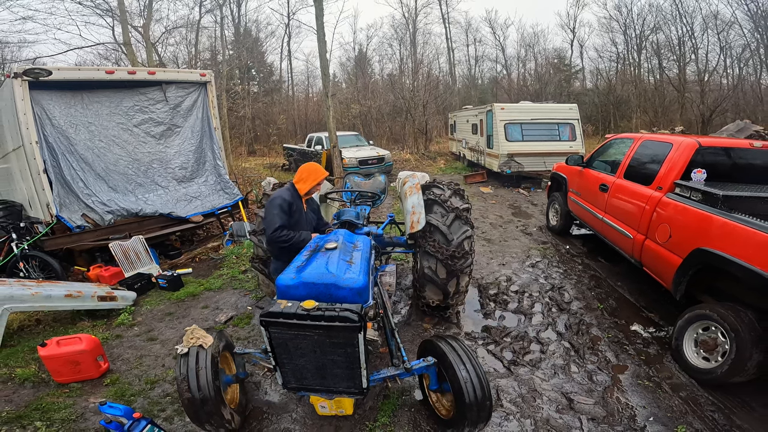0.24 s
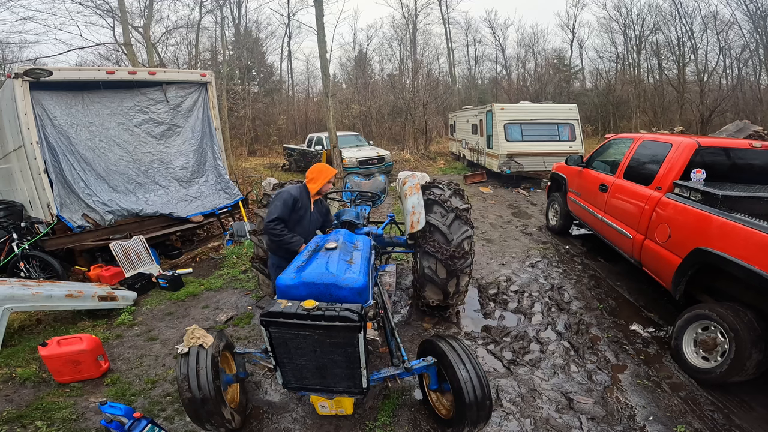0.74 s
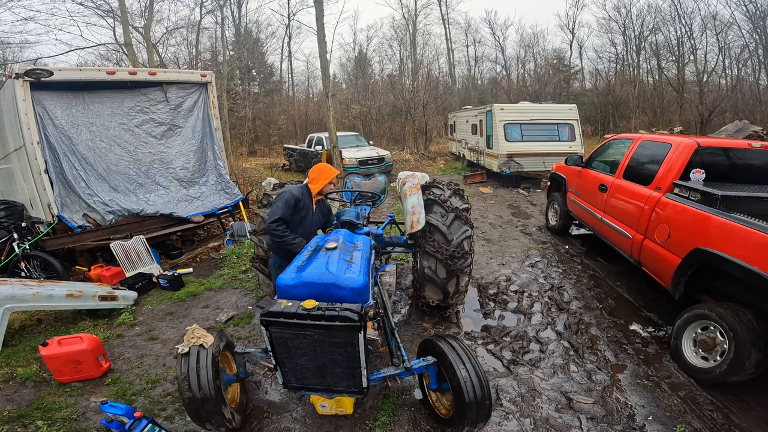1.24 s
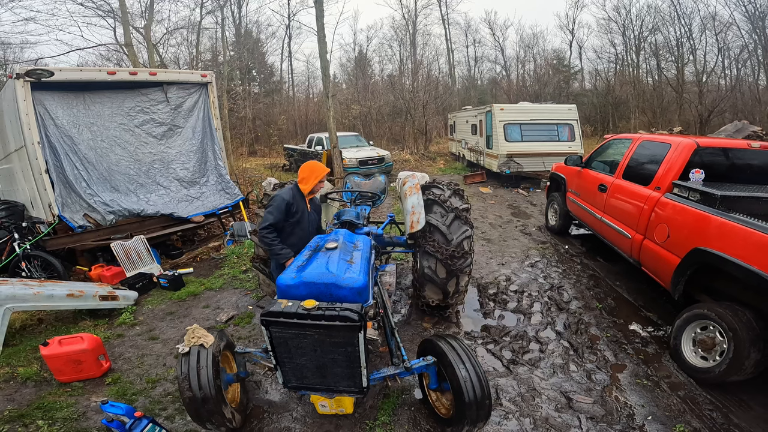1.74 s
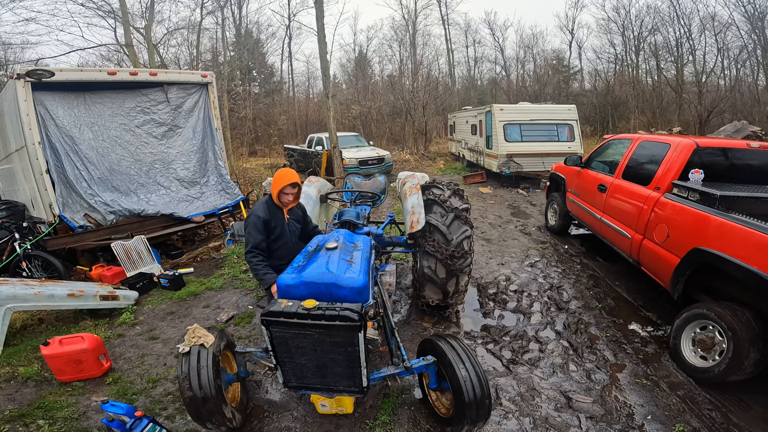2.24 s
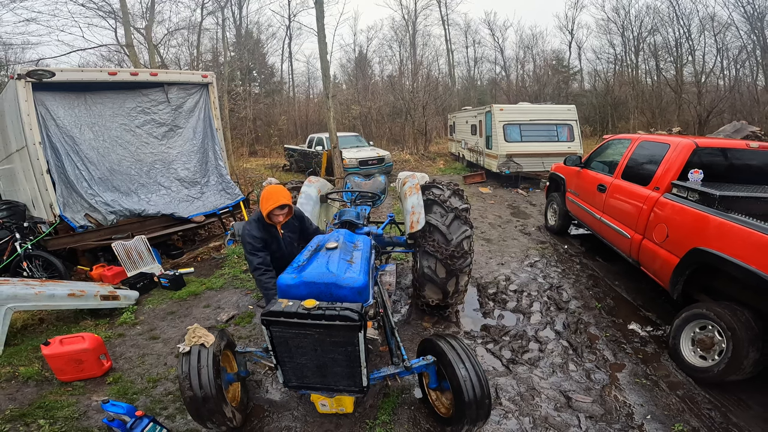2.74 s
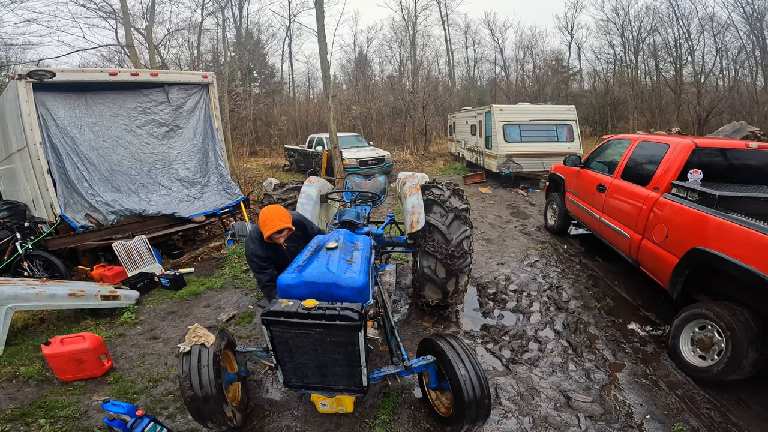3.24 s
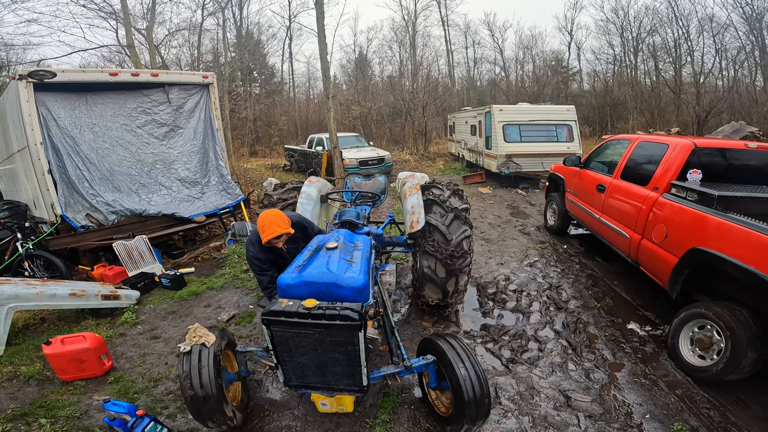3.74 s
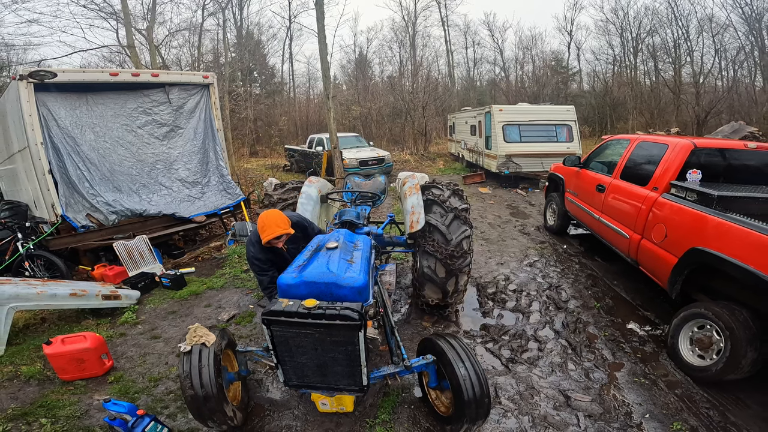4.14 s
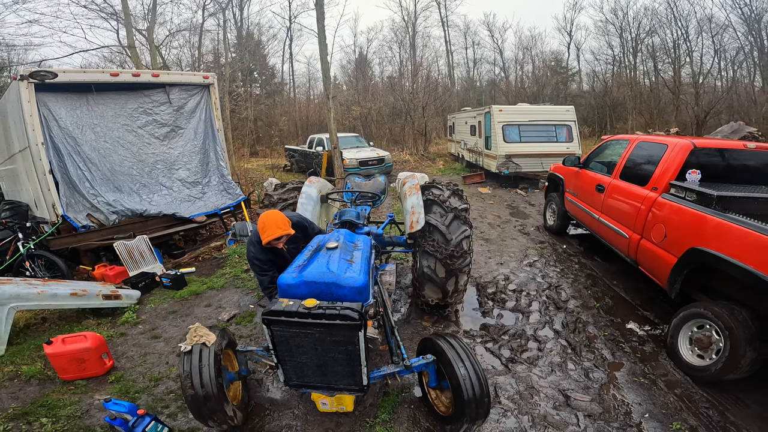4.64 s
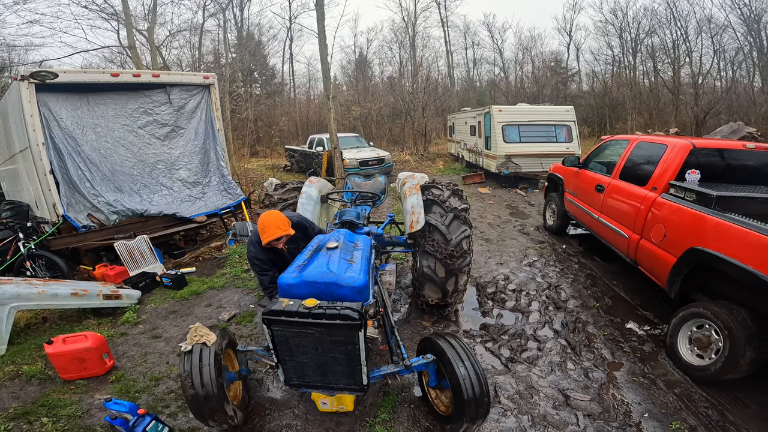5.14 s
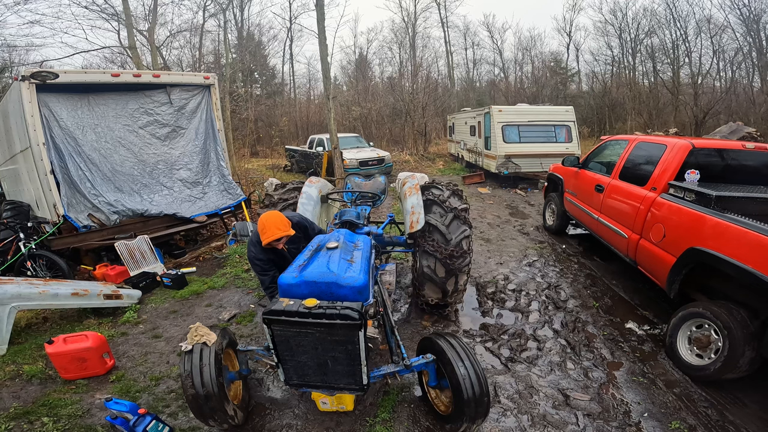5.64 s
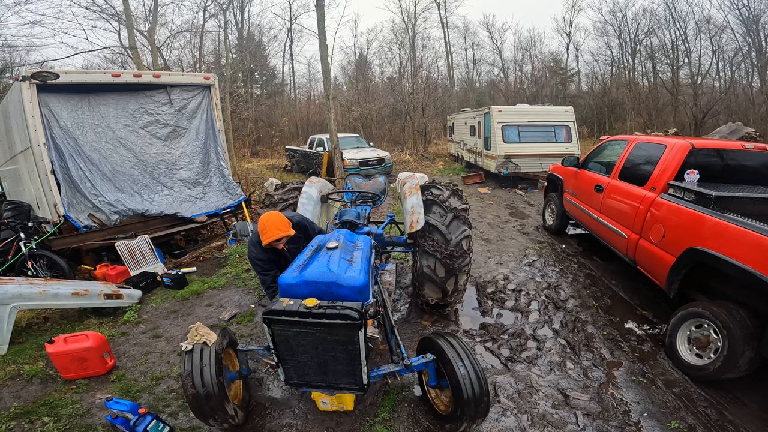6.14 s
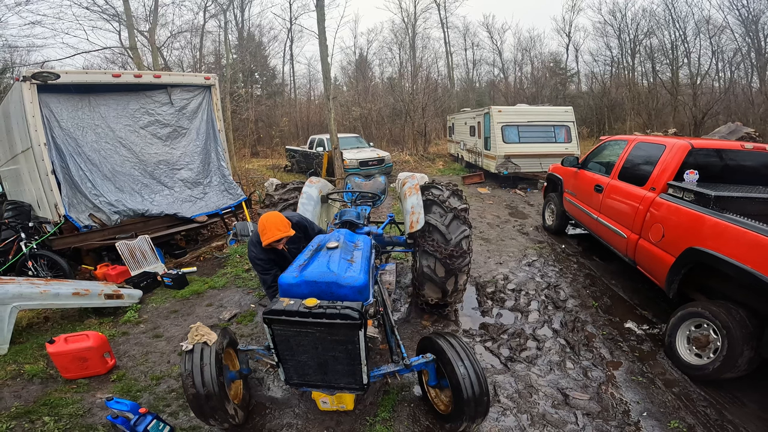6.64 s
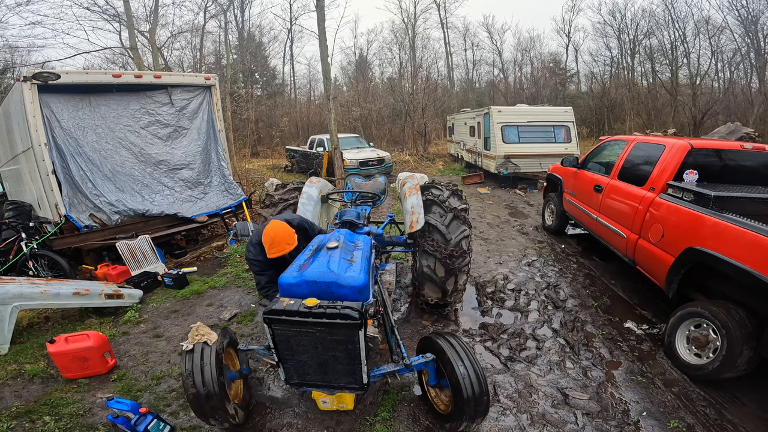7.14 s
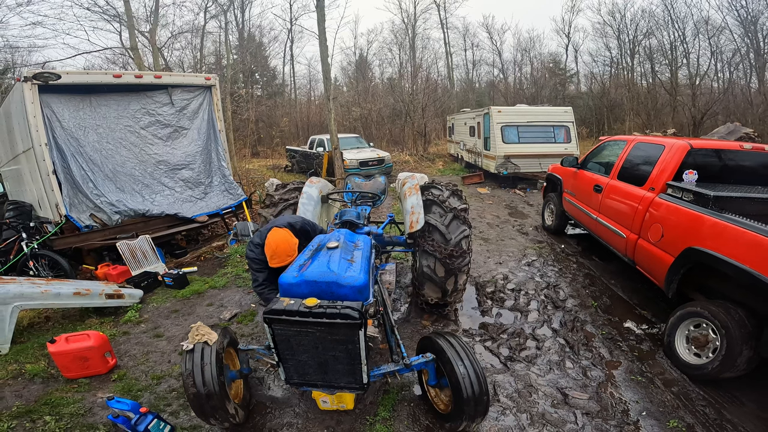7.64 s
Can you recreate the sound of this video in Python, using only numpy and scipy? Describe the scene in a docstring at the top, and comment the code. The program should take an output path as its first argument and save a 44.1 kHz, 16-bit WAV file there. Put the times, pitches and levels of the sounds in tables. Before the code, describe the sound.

After light handling knocks, a solenoid clacks and a tractor engine cranks over and over, gears whining, coughing briefly without starting.

```python
"""Whining, clattering gears: a tractor cranks on its electric starter in an open yard and does not catch.
After a few handling knocks the solenoid clacks and the pinion grinds up to speed.
Each compression drags it down; its teeth ring the flywheel housing and the iron, and the frame booms.
A few cylinders cough early on. Faint ticks, light wind and woodland hiss lie behind;
wind and hiss are turned down once the starter runs."""
import sys
import numpy as np
from scipy import signal
from scipy.fft import rfft, irfft
from scipy.io import wavfile
from scipy.ndimage import uniform_filter1d

SR = 44100
rng = np.random.default_rng(int(sys.argv[2]) if len(sys.argv) > 2 else 0)


def inscribe(sig):
    """Save sig as 16-bit PCM at rate SR to the path in sys.argv[1].

    A 1-D sig is mono; a 2-D sig holds one channel per row.
    Samples are clipped to [-1, 1] before scaling.
    """
    pcm = np.round(np.clip(np.atleast_2d(sig).T, -1, 1) * 32767)
    wavfile.write(sys.argv[1], SR, pcm.astype(np.int16))


N = 348390
TIME = np.arange(N) / SR
FREQS = np.arange(N // 2 + 1) * SR / N

# flywheel housing modes: centre_hz, width_hz, gain_db
HOUSING_MODES = [(486, 27.6, -6), (653, 22, -6), (787, 49, -14), (916.2, 40, 0.5), (1013, 55, -8),
                 (1134, 49, -10.5), (1408, 49, -5), (1475, 44, -6.5), (1713, 160, -14.5)]
# spectrum of a hard click: freq_hz, density_db
CLICK_SPECTRUM = [(400, -28), (1000, -2), (2500, -5.5), (5400, 1), (7300, -2.5), (9000, -7.5), (12500, -14),
                  (15000, -34)]


def from_db(db):
    """Decibels to gain."""
    return np.exp(np.asarray(db) * (np.log(10) / 20))


def unit_rms(x):
    """Scale to rms 1."""
    return x / np.sqrt(np.mean(x ** 2) + 1e-20)


def hold_level(x, samples):
    """Hold the running rms at 1."""
    return x / np.sqrt(np.abs(uniform_filter1d(x ** 2, samples)) + 1e-9)


def curves(rows, at, period=None):
    """Interpolate each later column against the first."""
    first, *columns = np.transpose(rows)
    return [np.interp(at, first, column, period=period) for column in columns]


def colour(x, spectrum):
    """Filter by a spectrum, 12 dB/octave skirts beyond its ends; rms 1."""
    hz, db = np.transpose(spectrum)
    f = np.maximum(FREQS, 1)
    gain = from_db(np.interp(np.log(f), np.log(hz), db))
    skirts = np.minimum(f / hz[0], 1) ** 2 * np.minimum(hz[-1] / f, 1) ** 2
    return unit_rms(irfft(rfft(x) * gain * skirts, N))


def noise(side_db):
    """White mid/side stereo noise; rms 1."""
    mid, side = rng.standard_normal((2, N))
    return unit_rms(mid + from_db(side_db) * side * [[1], [-1]])


def drift(cutoff_hz):
    """Smooth random wander; rms 1."""
    hop = 40
    lowpass = signal.butter(2, cutoff_hz, fs=SR / hop, output="sos")
    slow = signal.sosfiltfilt(lowpass, rng.standard_normal(N // hop + 2002))[1000:-1000]
    return np.interp(np.arange(N) / hop, np.arange(len(slow)), unit_rms(slow))


def resonate(x, modes):
    """Parallel two-pole resonators, alternating in sign."""
    out = 0
    for k, (centre_hz, width_hz, gain_db) in enumerate(modes):
        radius = np.exp(-np.pi * width_hz / SR)
        b = np.array([1, 0, -1]) * (1 - radius ** 2) / 2
        a = [1, -2 * radius * np.cos(2 * np.pi * centre_hz / SR), radius ** 2]
        out = out + (-1) ** k * from_db(gain_db) * signal.lfilter(b, a, x)
    return out


def burst(peak_s, rise_s, decay_s):
    """Exponential rise to 1, exponential decay."""
    age_s = TIME - peak_s
    return np.exp(np.maximum(np.minimum(age_s / rise_s, -age_s / decay_s), -40))


def partial(start_s, level_db, pitch_hz, t60_s):
    """Decaying sine of struck metal."""
    age_s = np.clip(TIME - start_s, 0, 1)
    return from_db(level_db - 60 * age_s / t60_s) * np.sin(2 * np.pi * pitch_hz * age_s)


def wind_and_woods():
    """Lumpy wind and woodland hiss, both turned down once the starter runs."""
    # preset gain-control dip, steepest for the hiss at start-up: time_s, wind_db, hiss_db
    levels = [(0, -38, -37.5), (2.6, -38, -36), (2.8, -39, -48), (5.8, -42.5, -43), (7.9, -55, -52)]
    # spectra: freq_hz, density_db
    wind_spectrum = [(15, -14), (28, -0.5), (48, -0.5), (80, -3.5), (130, -15.5), (250, -16)]
    woods_spectrum = [(76, -33), (130, -11.5), (159, -0.5), (179, -9), (210, -9.5), (398, -11.5),
                      (548, -10), (656, -11.5), (922, -11), (1080, -7.5), (1270, -8), (5360, -18.5),
                      (12200, -36), (15400, -53)]
    wind_db, hiss_db = curves(levels, TIME)
    wind = from_db(wind_db + 4.2 * drift(6.9)) * colour(noise(-18.5), wind_spectrum)
    woods = from_db(hiss_db + 0.73 * drift(22)) * colour(noise(-7), woods_spectrum)
    return wind + woods


def ticks(per_s, level_db, decay_s):
    """Faint, bright ticks about the wet yard."""
    impulses = (rng.random(N) < per_s / SR) * rng.uniform(0.42, 1, N)
    envelope = signal.lfilter([1], [1, -np.exp(-1 / (decay_s * SR))], impulses + 1e-18)
    return from_db(level_db) * envelope * colour(noise(-13), CLICK_SPECTRUM)


def yard_echoes(x, echo_db, t60_s, side_db):
    """Add sparse echoes off the ground and parked vehicles."""
    delay_s = TIME[:SR // 4]
    echoes = noise(side_db)[:, :len(delay_s)] * from_db(-60 * delay_s / t60_s)
    echoes *= (rng.random(len(delay_s)) < .01) * (delay_s > .002)
    echoes /= np.sqrt(np.sum(echoes ** 2, axis=1, keepdims=True))
    return x + from_db(echo_db) * signal.fftconvolve(x, echoes, axes=1)[:, :N]


def knocks():
    """Short, dull handling contacts around the engine."""
    # peak_s, level_db, centre_hz, decay_s
    contacts = [(1.134, -38.5, 700, .06), (1.34, -33.5, 850, 0.032), (2.088, -30, 1200, 0.02),
                (2.114, -32, 1000, .012), (2.283, -27, 1900, 0.0061), (2.307, -27, 420, 0.0037),
                (2.339, -33, 1398, .006), (2.544, -27, 1470, .014)]
    touch, out = noise(-11), 0
    for peak_s, level_db, centre_hz, decay_s in contacts:
        body = [(centre_hz, 0.83 * centre_hz, 0)]
        thud = unit_rms(resonate(resonate(touch, body), body))
        out = out + from_db(level_db) * burst(peak_s, 0.00082, decay_s) * thud
    return out


def clinks():
    """Loose metal, handled or shaken by a cough: one partial each."""
    # start_s, level_db, pitch_hz, t60_s
    hits = [(0.935, -38, 2700, .08), (1.465, -40, 3510, .13), (4.31, -24, 6100, .09),
            (4.863, -23, 6115, .12)]
    return sum(partial(*hit) for hit in hits)


def coughs(gulp_s, lead_s):
    """A cylinder spits air, then a low-pressure gulp flutters out."""
    # time_s, thump_db, hiss_db
    events = [(3.128, -15.5, -19), (3.41, -15, -24.5), (3.543, -14.5, -15), (3.794, -12.5, -19.5),
              (3.92, -20.5, -26), (4.049, -23.5, -28.5), (4.319, -16, -19.5), (4.457, -16.5, -23),
              (4.735, -20.5, -26), (4.873, -17.5, -20), (5.012, -17, -22.5)]
    # spectra: freq_hz, density_db
    spit_spectrum = [(200, -1.5), (700, 9), (1100, 2), (2000, 0), (5400, 0.5), (6200, 4.5), (7200, -1),
                     (10000, -5.5), (13000, -13), (15500, -36)]
    flutter_spectrum = [(35, -13), (65, 3), (115, -1.5), (200, -7), (450, -16.5)]
    gulp, spit, flutter = np.zeros((3, N))
    for time_s, thump_db, hiss_db in events:
        gulp -= from_db(thump_db) * np.exp(-np.minimum(((TIME - time_s) / gulp_s) ** 2, 20))
        spit += from_db(hiss_db) * burst(time_s - lead_s, 0.0077, 0.016)
        flutter += from_db(thump_db) * burst(time_s - .002, 0.017, 0.027)
    gulp = from_db(6.5) * signal.sosfilt(signal.butter(1, 28, "high", fs=SR, output="sos"), gulp)
    spit = from_db(3) * spit * colour(noise(-10.5), spit_spectrum)
    flutter = from_db(-3) * flutter * colour(noise(-41), flutter_spectrum)
    return gulp + spit + flutter


def solenoid(start_s):
    """The plunger slams home and throws the pinion against the ring gear."""
    # solenoid and pinion modes: pitch_hz, gain_db, t60_s
    modes = [(1190, -8, 0.16), (3370, -6.5, 0.16), (4300, -8.5, 0.054), (5420, -5, .06), (6770, -2, .06),
             (8576, -9, 0.063), (12030, -20, 0.079)]
    ring = sum(partial(start_s, gain_db, pitch_hz, t60_s) for pitch_hz, gain_db, t60_s in modes)
    clack = burst(start_s, .0002, 0.014) * colour(noise(-10), CLICK_SPECTRUM)
    return from_db(-15.5) * ring + from_db(-12.5) * clack


def crank(full_speed_hz=466, boom_db_per_octave=-16, slack_strokes=0.12):
    """Tooth rate and levels from starter effort, stroke phase and the cylinder in turn."""
    # tops of compression: time_s, stroke_count
    pace = [(2.63, 0), (3.013, 2), (3.163, 3), (3.441, 5), (3.695, 7), (4.076, 10), (4.631, 14),
            (5.595, 21), (5.905, 23), (6.503, 27), (7.937, 37)]
    # spin-up, light running on the coughs, labouring: time_s, tooth_hz, whine_db, clatter_db, grip_db
    effort = [(2.63, 289.9, -23, -18.5, 2), (2.92, 382, -19.5, -18, 3), (3.06, 452, -17, -16.5, 0),
              (3.2, 467, -19.5, -18, -5), (3.38, 467.5, -20, -18, -5.5), (3.58, 494.3, -27.5, -17, -7),
              (3.9, 499.5, -26, -17.5, -7), (4.14, 472.9, -19, -17.5, -5), (5.3, 468, -19.3, -18.3, -5.5),
              (5.66, 453.8, -17.5, -21, 3), (6.3, 457.8, -19.5, -18.5, -3), (7.9, 464.8, -19.5, -18.5, -4)]
    # swing within a stroke: phase_strokes, speed_ratio, whine_db, clatter_db, boom_db
    stroke_shape = [(0, .97, -8.5, -3.3, -4.5), (.1, 1.035, -2.5, 0, -5), (.2, 1.07, 0.3, 1, -3.5),
                    (.31, 1.055, 1.3, 1.5, -4.5), (.42, 1.02, 3.3, 2, -2), (.52, .988, 5.5, 0.3, -2),
                    (.62, .962, 4, -1.2, 1), (.74, .935, -1.5, 0.3, 1.2), (.87, .955, 0.5, -1, 3.5)]
    # offsets of the four cylinders: whine_db, grip_db, boom_db
    cylinders = [(1.0, 3.0, -1.2), (-0.7, -1, 1.0), (0.7, -0.8, -0.9), (-0.8, -1.8, 1)]
    strokes, = curves(pace, TIME)
    tooth_hz, whine_db, clatter_db, grip_db = curves(effort, TIME)
    speed, whine_swing_db, clatter_swing_db, boom_swing_db = curves(stroke_shape, strokes, period=1)
    own_whine_db, own_grip_db, own_boom_db = np.transpose(cylinders)
    cylinder = strokes.astype(int) % len(cylinders)
    whine_db += uniform_filter1d(own_whine_db[cylinder], size=1500)
    boom_db = -32 + boom_db_per_octave * np.log2(tooth_hz / full_speed_hz) + boom_swing_db
    boom_db += uniform_filter1d(own_boom_db[cylinder], size=1500)
    # around each top of compression the engine overruns the starter and the teeth go slack
    top = np.round(strokes).astype(int)
    near_top = np.exp(-((strokes - top) / slack_strokes) ** 2)
    slack_db = (grip_db + own_grip_db[top % len(cylinders)]) * near_top
    load_db = whine_swing_db + .5 * slack_db
    # speed dips deepen as the starter takes up the load
    speed = 1 + (speed - 1) * np.interp(TIME, [3.0, 5.2], [.55, 1.0])
    return tooth_hz * speed, whine_db, load_db, clatter_db, clatter_swing_db, slack_db, boom_db


def frame_boom(boom_db, slack_db):
    """The frame booms over a low rumble, hardest at the motor's first jerk."""
    # freq_hz, density_db
    rumble_spectrum = [(25, -3), (45, -6), (66, 5.5), (90, -7), (118, -2.5), (170, -19), (268, -4.5),
                       (340, -6), (450, -15)]
    shudder = resonate(resonate(rng.standard_normal(N), [(170.6, 22, 0)]), [(173, 45, 0)])
    jerk = from_db(-14) * burst(2.66, 0.0094, 0.054)
    boom = (from_db(boom_db + 2.1 * drift(13)) + jerk) * hold_level(shudder, samples=1200)
    rumble = from_db(-39 - 0.24 * slack_db + 2.3 * drift(8.6)) * colour(noise(-38), rumble_spectrum)
    return boom + rumble


def tooth_blows(teeth, uneven_db, decay_per_tooth):
    """Envelope: each tooth lands with its own strength and rolls off."""
    strength = from_db(uneven_db * np.clip(rng.standard_normal(N // 20), -2, 2))[teeth.astype(int)]
    return unit_rms(strength * np.exp(-decay_per_tooth * (teeth % 1)))


def motor_grind(blows):
    """The motor strains until the flywheel is up to speed."""
    # freq_hz, density_db
    spectrum = [(50, -6), (100, -4), (170, -4), (280, 0), (420, -4), (650, -0.5), (1150, -1.5), (1600, -13),
                (2500, -38)]
    return from_db(-16) * burst(2.655, 0.025, .21) * colour(blows * noise(-23), spectrum)


def iron_rasp(teeth, blows):
    """Teeth scrape and ring the iron, each mode at a wandering strength."""
    # centre_hz, width_hz, gain_db
    iron_modes = [(2484, 54, -4.5), (2926, 110, 1), (3390, 155, 1), (3705, 107, 1.5), (4020, 39, 2.5),
                  (4465, 140, -1.5), (5980, 280, -5), (7170, 210, -2), (7570, 160, -8)]
    # freq_hz, density_db
    spectrum = [(1200, -25), (2000, 0.5), (2600, -0.5), (3400, 0.5), (4600, -2), (5300, -2), (7600, -4.5),
                (8100, -12), (10000, -14), (12500, -24.5), (15000, -40)]
    rasp = .62 * blows * noise(-11)
    scrape = noise(-9.5)
    for mode in iron_modes:
        drive = tooth_blows(teeth, uneven_db=3, decay_per_tooth=3.6) * from_db(2.3 * drift(15))
        rasp += resonate(drive * scrape, [mode])
    return colour(rasp, spectrum)


def gear_clatter(blows):
    """Tooth strikes, direct and through the housing."""
    # freq_hz, density_db
    spectrum = [(200, -32), (350, -16.5), (470, -4.5), (620, -0.5), (760, -7.5), (1000, 1), (1150, -0.5),
                (1330, 0), (1600, -0.5), (1850, -6), (2150, -16), (3000, -38)]
    strikes = blows * noise(-12)
    return colour(strikes + resonate(strikes, HOUSING_MODES), spectrum)


def gear_whine(teeth, load_db, pinion_teeth=10, wobble_teeth=0.035, flutter_db=2.5, direct_db=-22.5):
    """Tooth-rate harmonics swell as they slide through the housing modes."""
    # off-centre pinion: teeth meet early and late once per turn
    mesh = teeth + wobble_teeth * (1 + .5 * drift(8.8)) * np.sin(2 * np.pi * teeth / pinion_teeth)
    force = sum(from_db(harmonic_db + flutter_db * drift(67)) * np.sin(2 * np.pi * k * mesh)
                for k, harmonic_db in enumerate([-5, 3, 3.3, -1], 1))
    force *= from_db(load_db)
    radiated = resonate(force, HOUSING_MODES) + from_db(direct_db) * force
    return hold_level(radiated, samples=6400)  # about one stroke


def starter(engage_s):
    """The pinion drives the ring gear: whine, clatter, rasp, frame boom and grind."""
    tooth_hz, whine_db, load_db, clatter_db, swing_db, slack_db, boom_db = crank()
    teeth = np.cumsum(tooth_hz * (1 + .007 * drift(50) + .005 * drift(9))) / SR
    blows = tooth_blows(teeth, uneven_db=1.5, decay_per_tooth=1.3)
    whine = from_db(whine_db + 1.13) * gear_whine(teeth, load_db)
    clatter = from_db(clatter_db + 0.78 * swing_db + 0.94 * slack_db - 3) * gear_clatter(blows)
    rasp = from_db(0.41 * clatter_db + 1.23 * swing_db + 1.24 * slack_db - 19) * iron_rasp(teeth, blows)
    engaged = np.clip((TIME - engage_s) / 0.0083 + .5, 0, 1)
    return engaged * (whine + clatter + rasp + frame_boom(boom_db, slack_db) + motor_grind(blows))


def scene():
    """Machinery with yard echoes; coughs and background without."""
    tractor = starter(engage_s=2.632) + solenoid(start_s=2.609) + knocks() + clinks()
    tractor = yard_echoes(tractor, echo_db=-12, t60_s=0.15, side_db=-6)
    patter = ticks(per_s=9, level_db=-34.5, decay_s=0.0033)
    return tractor + coughs(gulp_s=0.005, lead_s=0.011) + wind_and_woods() + patter


def record(dry):
    """Left side slightly brighter, then limiter, soft clip and low-pass."""
    ceiling_db, cutoff_hz = -10.5, 15500
    treble = signal.sosfilt(signal.butter(1, 12000, "high", fs=SR, output="sos"), dry)
    tilted = dry + from_db(-9) * treble * [[1], [-1]]
    power = np.abs(uniform_filter1d(np.mean(tilted ** 2, axis=0), size=500))
    limited = tilted / (1 + (power / from_db(ceiling_db) ** 2) ** 2) ** .25
    rounded = 1.188 * np.tanh(limited / 1.212)
    return signal.sosfilt(signal.ellip(10, .2, 80, cutoff_hz, fs=SR, output="sos"), rounded)


dry = scene()
out = record(dry)
inscribe(out)
```